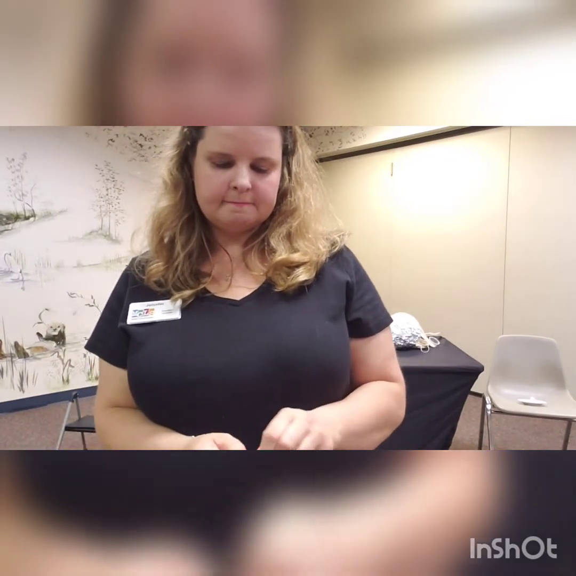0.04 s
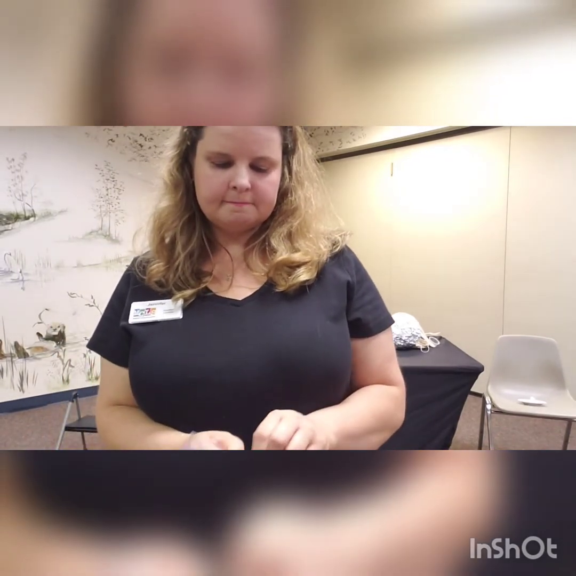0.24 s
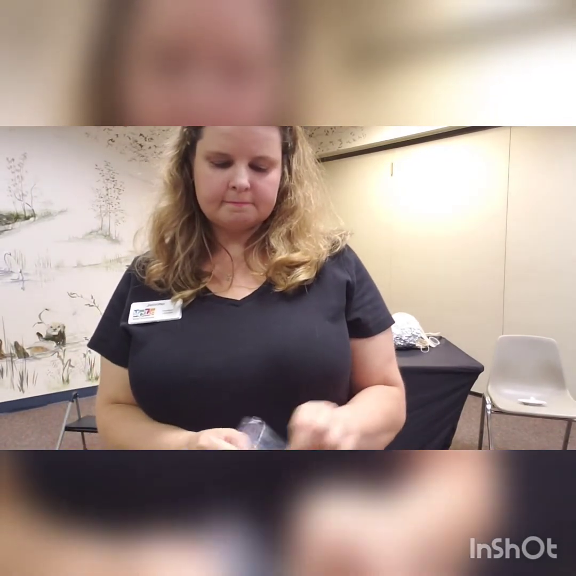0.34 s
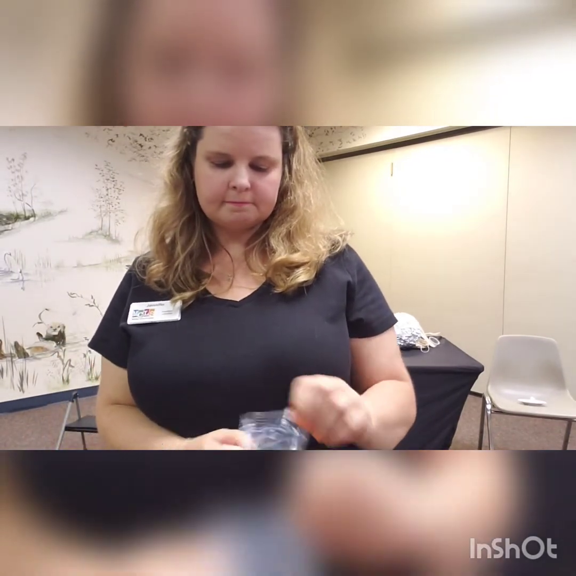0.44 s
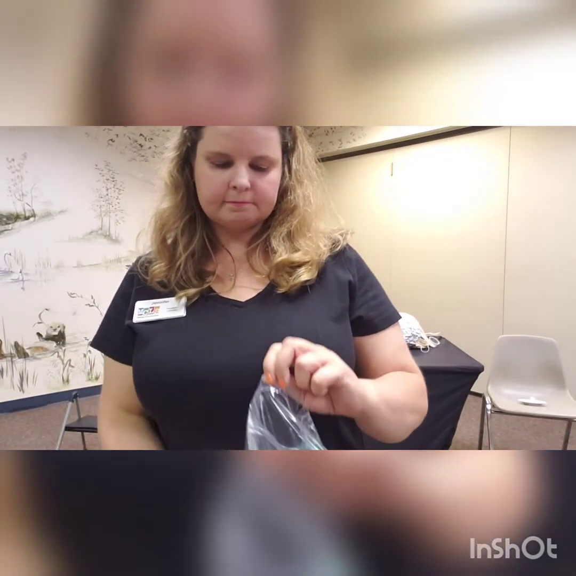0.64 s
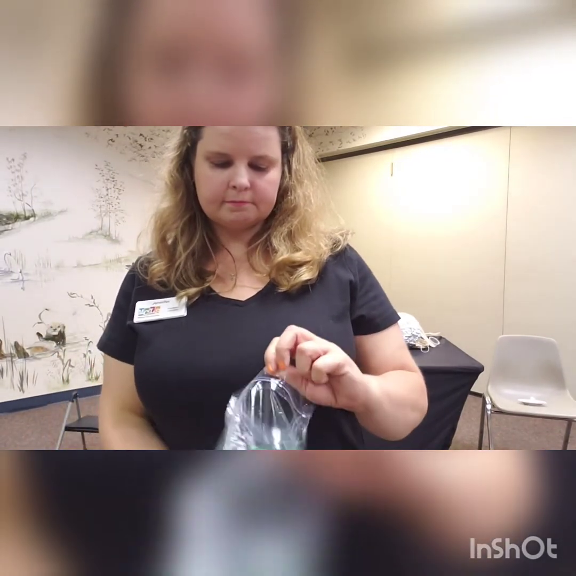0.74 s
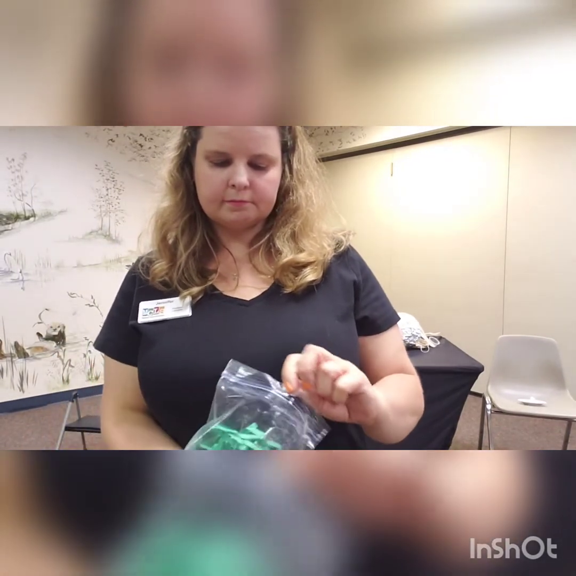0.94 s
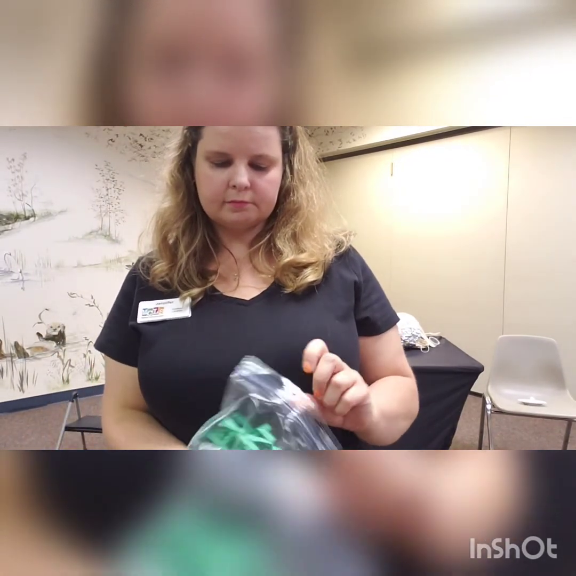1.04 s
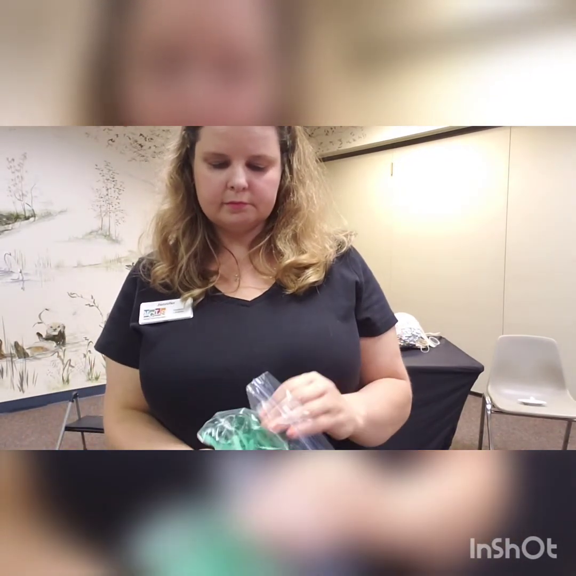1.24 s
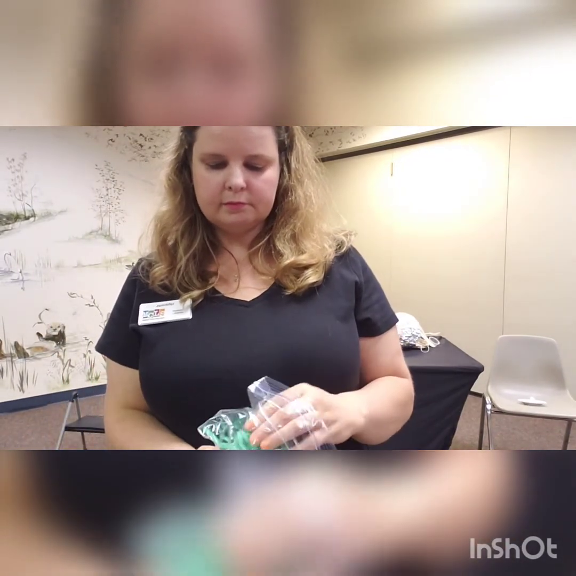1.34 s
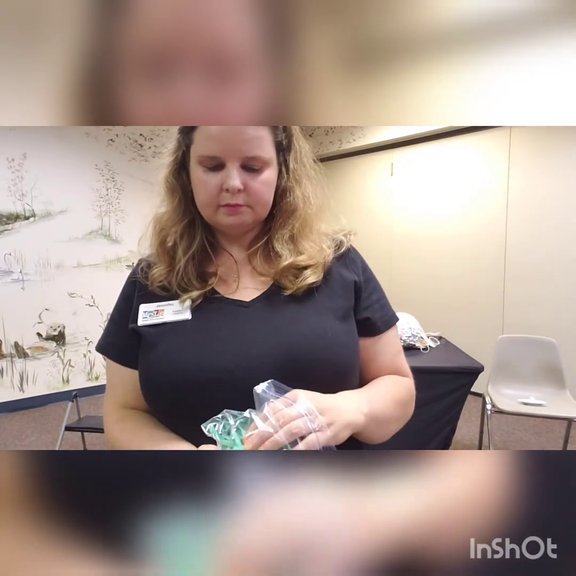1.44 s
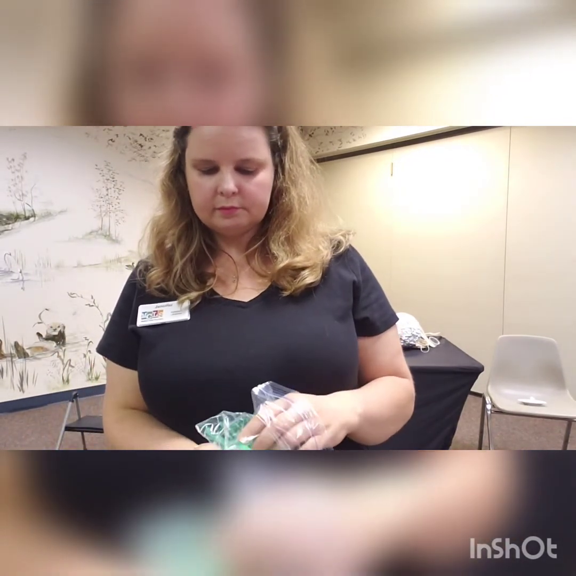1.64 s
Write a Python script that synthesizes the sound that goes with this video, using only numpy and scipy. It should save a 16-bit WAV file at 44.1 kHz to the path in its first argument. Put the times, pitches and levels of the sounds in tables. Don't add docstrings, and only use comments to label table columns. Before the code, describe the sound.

A thin plastic bag, close and slightly right. Low ventilation rumble and a few faint ticks until 0.19 s, then loud, bright seal-tearing snaps with short hollow rings, dense to 0.42 s, with weaker ones near 0.48. A lull, then lighter crinkles and paper rustle from 0.75 s, with clearer snaps around 0.95, 1.01 and 1.25. A tiny, very high finger squeak at 1.60-1.64 s. Short carpeted-room reverberation.

```python
import sys
import numpy as np
from scipy import signal
from scipy.fft import rfft, irfft, next_fast_len
from scipy.io import wavfile
from scipy.ndimage import uniform_filter1d, map_coordinates

SR = 44100
rng = np.random.default_rng(int(sys.argv[2]) if len(sys.argv) > 2 else 0)


def store_wav(level_fs):
    pcm = np.round(np.clip(np.atleast_2d(level_fs), -1, 1) * 32767)
    wavfile.write(sys.argv[1], SR, pcm.T.astype(np.int16))


def makeup_ratio(level_db):
    decades = np.asarray(level_db, float) / 20
    return 10 ** decades


N = 74970

# [t/s, level/dB]
VENTILATION = [(0, -55), (.165, -50), (.24, -49), (.45, -52), (.65, -51), (.73, -55.5), (.8, -48.5),
               (1.3, -51), (1.7, -51)]
# [f/Hz, density/dB]
RUMBLE_SPECTRUM = [(20, -54.5), (33, -8), (42, 7), (90, 0), (140, -5), (230, -12), (480, -24), (900, -53.5)]
# [f/Hz, density/dB]
HISS_SPECTRUM = [(290, -34), (500, -22), (761, -9), (843, -14), (3200, -30.5), (7500, -24), (11500, -32.5),
                 (16000, -32.5)]
# [f/Hz, t60/s]
ROOM_DECAY = [(300, 0.64), (2000, 0.31), (8000, 0.43), (15000, 0.28)]
# [f/Hz, level/dB]
ROOM_WIDTH = [(200, -5), (1000, 0), (4000, 0)]
# [f/Hz, level/dB]
PORT_SCATTER = [(100, -18), (500, -11), (2000, -5), (4500, 1), (9000, 1), (15000, -1)]
# [f/Hz, phase/rad]
PORT_LAG = [(0, 0), (2300, 1.2), (4100, 2.4), (8300, 4.6), (11000, 6.2), (17000, 6.6)]
# [t/s, level/dB, f/Hz]
FINGER_SLIPS = [
    (1.603, -43, 11800),
    (1.618, -38, 12900),
    (1.631, -43.5, 12600),
    (1.639, -38, 12900),
]
# [t/s, level/dB, f/Hz]
FINGER_DRAG = [
    (1.57, -77, 11400),
    (1.6, -58, 11600),
    (1.64, -53, 13000),
    (1.665, -66, 13450),
    (1.69, -94, 13500),
]
# [t/s, rustle level/dB, dullness/dB]
HAND_EFFORT = [(0, -72, 9), (.19, -90.5, 7.5), (.2, -19, -17), (.255, -59.5, 20.5), (.3, -44, 7.5),
               (.4, -38.5, -3), (.45, -55.5, 7.5), (.56, -56, 0.5), (.62, -86, -1), (.742, -89, 8.5),
               (.75, -66.5, 12.5), (.86, -51, 0), (1.03, -64, 3.5), (1.11, -72.5, 8.5), (1.16, -57.5, 3.5),
               (1.43, -58.5, -0.5), (1.47, -67, 3), (1.62, -52.5, -2)]
# [f/Hz, density/dB]
PAPER_SPECTRUM = [(300, -26.5), (500, -0.5), (1400, -1.5), (3000, -1), (5500, 0.5), (9000, -7.5),
                  (12500, -1), (16000, -3.5)]
# [t/s, peak level/dB, f/Hz, fade/ms]
PANEL_RINGS = [(.2015, -30, 1080, 2.9), (.2032, -35, 700, 5.3), (.2035, -21, 2410, 1.94),
               (.2042, -28, 3060, 1.3), (.326, -39, 760, 5.3), (.4797, -44.5, 1110, 2),
               (.48, -46, 3320, 1.4), (.7485, -56.5, 1774, 2.3), (.758, -59, 1300, 3.5),
               (.77, -58, 2070, 3.6), (1.606, -58.5, 1105, 2.6), (0.208, -33, 1005, 2.6),
               (.2135, -45, 620, 2.5), (.231, -46.5, 520, 6.5), (0.2677, -35, 393, 3.6),
               (.2715, -32, 650, 2.3), (.2885, -26, 2423, 3.3), (.295, -41, 400, 4.2),
               (.3098, -35, 670, 4.5), (.312, -29.5, 1803, 3.1), (.3157, -34, 2270, 1.8),
               (0.332, -51, 479, 5.3), (.341, -39.5, 434, 3.2), (0.3626, -43, 1020, 2.5),
               (0.397, -42.5, 1600, 3.3), (0.493, -47, 1365, 1.65), (0.8101, -46, 1465, 2.5),
               (.8107, -42.5, 2620, 2.1), (0.8302, -50, 1930, 1.6), (0.876, -53, 1606, 4),
               (.8745, -48, 2340, 2.3), (1.0115, -41.5, 3770, 1.9), (1.0113, -39.5, 5600, 0.79),
               (1.0114, -45.5, 890, 0.89), (1.0114, -49, 430, 1.8), (1.0175, -59, 2740, 1.8),
               (1.131, -58.5, 700, 6.2), (1.235, -57, 2000, 2.7), (1.239, -47.5, 5280, 1.8),
               (1.2435, -48, 5480, 2.8), (1.2472, -45, 5300, 2.06), (1.2525, -52.5, 2260, 1.7),
               (1.251, -53, 4140, 1.3), (1.2515, -52, 1685, 1.4), (1.257, -53, 1840, 2.8),
               (1.338, -50.5, 5600, 1.7), (1.34, -55, 5100, 2.5), (1.345, -51.5, 6140, 2.7)]
# [t/s, bright snap level/dB, hollow knock over it/dB, length/ms]
SEAL_TEARS = [(.1955, -13, -35, 1.5), (.2012, -13, -22, 1.8), (.2030, -11, -15, 1.8),
              (.2077, -16, -22, 1.8), (.2134, -24, -17, 1.5), (.2300, -18, -24, 1.3),
              (.2683, -20, -15, 1.2), (.2704, -16, -17, 1.3), (.2744, -28, -14, 1.3),
              (.2882, -14, -16, 1.8), (.2953, -14, -17, .8), (.3092, -12, -22, .8), (.3115, -17, -14, 1.4),
              (.3153, -19, -15, 1.3), (.3330, -16, -21, 1.8), (.3409, -17, -19, 1.3), (.3531, -23, -28, 1),
              (.3625, -17, -23, 1.6), (.3724, -17, -21, 1.3), (.3835, -21, -20, .9), (.3910, -22, -20, 1),
              (.3952, -27, -12, 1.3), (.4034, -29, -18, 1.5), (.4200, -25, -28, 1.5),
              (.4239, -31, -18, 1.1), (.4793, -37, -7, 1.7), (.4904, -37, -10, 1.1)]
# [t/s, bright snap level/dB, hollow knock over it/dB,
# length/ms]
FILM_CREASES = [(0.0614, -52, -21, 1.44), (0.7484, -33.5, -24.5, 1.2), (0.7614, -48.5, -13, 1.5),
                (0.8097, -43, -4.5, 1.2), (0.833, -33.5, -19, 2), (0.8735, -45.5, -13, 3.1),
                (0.8925, -37, -28, 1.5), (0.9523, -29, -24, 0.96), (1.0104, -38, -9.5, 1.5),
                (1.0162, -44, -7.5, 1.9), (1.046, -35, -30, 0.88), (1.132, -58, -11, 0.42),
                (1.233, -54, -21, 2.2), (1.2495, -45, -16, 0.74), (1.2508, -33.5, -14.5, 2.5),
                (1.3002, -39.5, -33, 2.7), (1.3430, -45.5, -15.5, 1.5), (1.4193, -40, -31, 1.3),
                (1.5057, -40.5, -30, 3.4), (1.5486, -43, -24, 2), (1.5699, -34.5, -33, 2.3),
                (1.605, -45, -10.5, 2.9), (1.6512, -46, -41, 2.8), (1.6834, -41, -29, 2.2)]
# [t/s, peak level/dB]
FOLD_TICKS = [(.0962, -48), (.132, -58), (.7896, -47), (.1922, -30), (.8235, -43), (.8268, -41),
              (.841, -47), (.8472, -43), (.8975, -44), (.9465, -42), (.9365, -47), (1.0872, -44),
              (1.1563, -45), (1.2057, -46), (1.389, -47), (1.401, -44), (1.4338, -46), (1.476, -50),
              (1.513, -40), (1.5268, -46), (1.5645, -45)]
# [f/Hz, density/dB]
FILM_SPECTRUM = [(1500, -30.5), (2500, 1), (4000, 1.5), (6000, 12), (9000, 6.5), (13000, 8.5), (16000, 4.5)]
# [f/Hz, density/dB]
CAVITY_SPECTRUM = [(200, -19.5), (330, -15), (600, -8.5), (1100, -12.5), (2300, -5), (3500, -1.5),
                   (5800, -21)]
# [f/Hz, density/dB]
FOLD_SPECTRUM = [(2000, -20), (4000, -23), (5500, 2), (8000, 6.5), (10000, -6.5), (12500, 6.5),
                 (16000, 1.5)]
# [f/Hz, density/dB]
POCKET_SPECTRUM = [(300, -16), (900, -21), (1500, 2.5), (2400, -9.5), (6000, -13)]

PAN_DB = -2.3


def unit(x):
    return x / np.sqrt(np.mean(x ** 2) + 1e-20)


def along(points, hz):
    f, v = np.transpose(points)
    return np.interp(np.log(hz + 1), np.log(f + 1), v)


def curves(rows):
    s, *cols = np.transpose(rows)
    return [np.interp(np.arange(N) / SR, s, c) for c in cols]


def wobble(rate):
    return map_coordinates(rng.standard_normal(int(N / 20)), [np.arange(N) * rate / SR])


def filtered(x, response):
    m = next_fast_len(x.shape[-1] + 1024)
    return irfft(rfft(x, m) * response(np.fft.rfftfreq(m, 1 / SR)), m)[..., :x.shape[-1]]


def coloured(x, spectrum):
    gain = lambda hz: makeup_ratio(along(spectrum, hz))
    return filtered(x, gain) / np.sqrt(np.mean(gain(np.linspace(0, SR / 2, num=2000)) ** 2))


def ventilation():
    strength_db, = curves(VENTILATION)
    mid, side = coloured(rng.standard_normal((2, N)), RUMBLE_SPECTRUM)
    side = filtered(side, lambda hz: makeup_ratio(along([(30, -20), (150, -18), (600, -1)], hz)))
    rumble = np.array([makeup_ratio(-0.5) * (mid + side), makeup_ratio(0.84) * (mid - side)])
    hiss = unit(coloured(rng.standard_normal((2, N)), HISS_SPECTRUM)) * makeup_ratio(-75.5)
    return makeup_ratio(strength_db) * rumble + hiss


def room(bag):
    out, step = np.zeros((2, N + SR)), SR // 10
    for a in range(0, N, step):
        hz, t, z = signal.stft(rng.standard_normal((2, SR // 2)), SR, nperseg=256)
        decay = makeup_ratio(-60 * t / along(ROOM_DECAY, hz)[:, None])
        tail = signal.istft(z * decay, SR, nperseg=256)[1]
        wet = signal.fftconvolve(bag[None, a:a + step], tail / np.linalg.norm(tail[0]), axes=1)
        start = a + 100
        out[:, start:start + wet.shape[1]] += wet
    mid, side = out[:, :N]
    side = filtered(side, lambda hz: makeup_ratio(along(ROOM_WIDTH, hz)))
    return makeup_ratio(-12) * np.array([makeup_ratio(PAN_DB / 2) * (mid + side), mid - side])


def ports(bag):
    left_right = np.array([[1], [-1]])
    z = signal.stft(bag, nperseg=32)[2]
    random_phase = np.exp(2j * np.pi * rng.random((2,) + z.shape))
    scattered = signal.istft(z * random_phase, nperseg=32)[1][:, :N] * 1.4
    share = lambda hz: makeup_ratio(along(PORT_SCATTER, hz))
    total = lambda hz: np.hypot(1, share(hz))
    phase = lambda hz: np.interp(hz, *np.transpose(PORT_LAG)) * left_right
    direct = filtered(bag, lambda hz: np.exp(-.5j * phase(hz)) / total(hz))
    both = direct + filtered(scattered, lambda hz: share(hz) / total(hz))
    return filtered(both, lambda hz: makeup_ratio(PAN_DB / 2 * left_right / (1 + (hz / 11500) ** 10)))


def squeak():
    slip_ms, rub_width_hz = 0.84, 700
    chirps, t = np.zeros(N + SR), np.arange(512) / SR
    u = t / (slip_ms / 1000)
    for s, db, hz in FINGER_SLIPS:
        chirp = u * np.exp(1 - 2 * u) * 2 * np.sin(2 * np.pi * hz * t)
        chirps[round(s * SR):][:t.size] += makeup_ratio(db) * chirp
    rub_db, pitch = curves(FINGER_DRAG)
    flutter = unit(filtered(rng.standard_normal(N), lambda hz: 1 / (1 + (hz / rub_width_hz) ** 2)))
    tone = np.sin(2 * np.pi * np.cumsum(pitch) / SR)
    return chirps[:N] + makeup_ratio(rub_db) * (rub_db > -84) * flutter * tone


def rustle():
    grains_per_s, grain_ms, grain_db = 900, .5, 3.5
    smooth = 1.4
    level_db, dull_db = curves(HAND_EFFORT)
    chance, size = rng.random(N), rng.exponential(size=N)
    creased = chance < grains_per_s * makeup_ratio(2.5 * wobble(25)) / SR
    hits = creased * makeup_ratio(grain_db * np.minimum(size, 2))
    t = np.arange(256) / SR
    grains = unit(np.convolve(hits, np.exp(-t / (grain_ms / 1000)))[:N])
    z = signal.stft((grains + smooth) * rng.standard_normal(N), nperseg=128)[2]
    patches = uniform_filter1d(rng.standard_normal(z.shape), size=6, axis=0)
    patches = unit(uniform_filter1d(patches, size=30, axis=1))
    rubbing = signal.istft(z * makeup_ratio(1.8 * patches), nperseg=128)[1][:N]
    bed = unit(coloured(rubbing, PAPER_SPECTRUM))
    low = filtered(bed, lambda hz: 1 / (1 + (hz / 2700) ** 8))
    return makeup_ratio(level_db + 1.2 * wobble(45)) * (bed - low + makeup_ratio(dull_db) * low)


def panels():
    sag, rise = 0.063, .3
    out, t = np.zeros(N + SR), np.arange(2048) / SR
    for s, db, hz, ms in PANEL_RINGS:
        u = t / (max(ms, .5) / 1000)
        cycles = hz * t * (1 - sag * np.minimum(u, 3) / 2)
        envelope = (1 - np.exp(-u / rise)) * np.exp(-u)
        out[round(s * SR):][:t.size] += makeup_ratio(db) * envelope * 2 * np.sin(2 * np.pi * cycles)
    return out[:N]


def snaps(rows, spectrum, body):
    rise = 0.86
    needle, needle_ms = 2.2, 0.15
    spike_db, patch_db = 3, 3
    knock_peak_db, snap_db, build_s = 12.5, 2, .001
    before = 192
    out, t = np.zeros(N + SR), (np.arange(1024) - before) / SR
    for s, db, knock_db, ms in rows:
        u = t / (max(ms, .3) / 1000)
        shape = np.where(u < 0, np.exp(np.minimum(u, 0) * rise), np.exp(-np.maximum(u, 0)))
        shape = shape + needle * np.exp(-abs(t) / (needle_ms / 1000))
        spikes = makeup_ratio(spike_db * uniform_filter1d(rng.standard_normal(t.size), size=9) * 3)
        knots = rng.standard_normal(12)
        patch = lambda hz: makeup_ratio(patch_db * np.interp(hz, np.linspace(0, SR / 2, num=12), knots))
        bright, hollow = rng.standard_normal((2, t.size)) * shape * spikes
        film = filtered(coloured(bright, spectrum), patch)
        knock = coloured(hollow, body)
        burst = film / abs(film).max() + makeup_ratio(knock_db + knock_peak_db) * knock / abs(knock).max()
        out[round((s + build_s) * SR) - before:][:t.size] += makeup_ratio(db + snap_db) * burst
    return out[:N]


def bag_film():
    ticks = [(s, db, -40, .6) for s, db in FOLD_TICKS]
    tears = snaps(SEAL_TEARS, FILM_SPECTRUM, CAVITY_SPECTRUM)
    creases = snaps(FILM_CREASES, FOLD_SPECTRUM, POCKET_SPECTRUM)
    return tears + creases + snaps(ticks, FOLD_SPECTRUM, POCKET_SPECTRUM)


def scene():
    bag = bag_film() + panels() + squeak() + rustle()
    reverberation = room(bag)
    return ports(bag) + reverberation + ventilation()


def top_cut(x):
    return signal.sosfilt(signal.butter(12, 17020, fs=SR, output="sos"), x)


def record(dry):
    top_hz = 15900
    limit = lambda hz: makeup_ratio(np.interp(hz, [top_hz - 100, top_hz + 200], [0, -55]))
    return top_cut(filtered(dry, limit))


dry = scene()
out = record(dry)
store_wav(out)
```